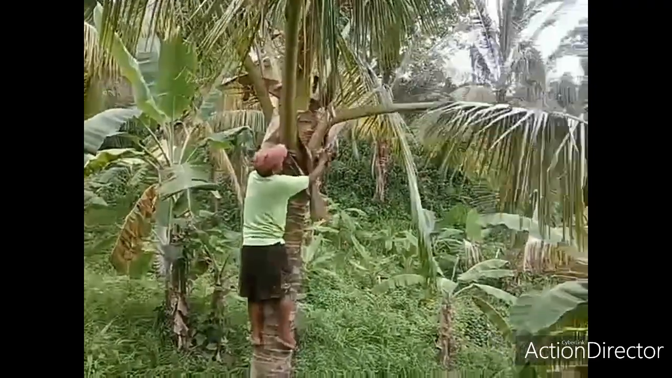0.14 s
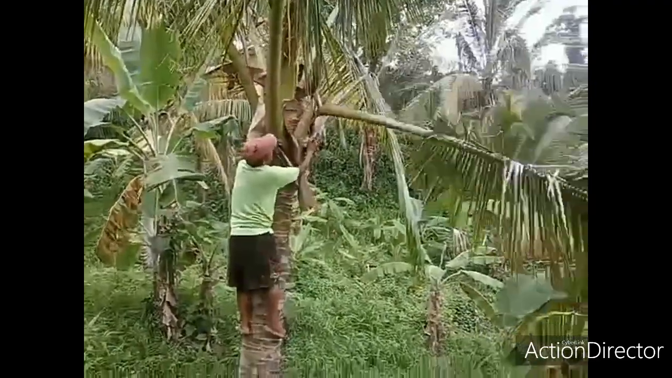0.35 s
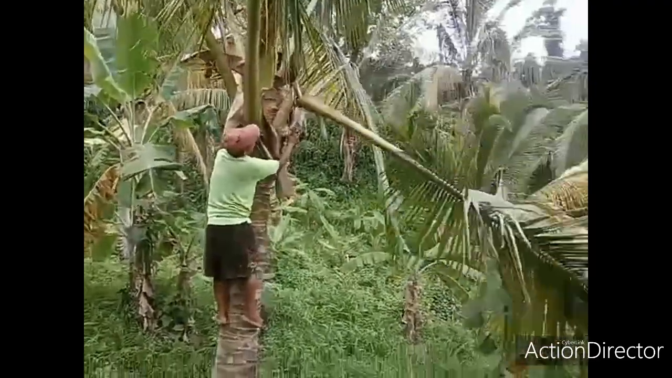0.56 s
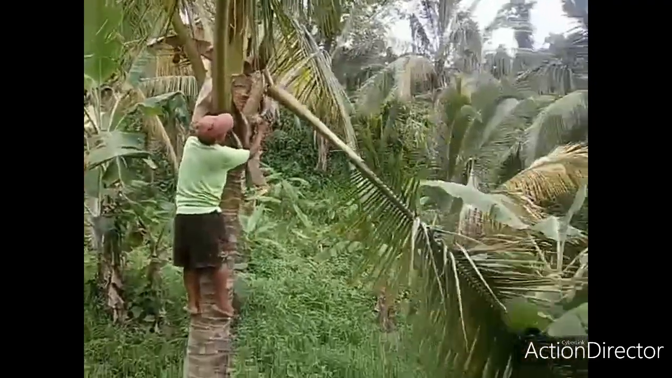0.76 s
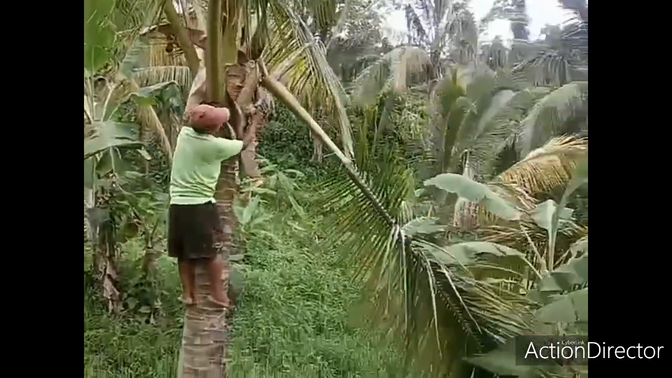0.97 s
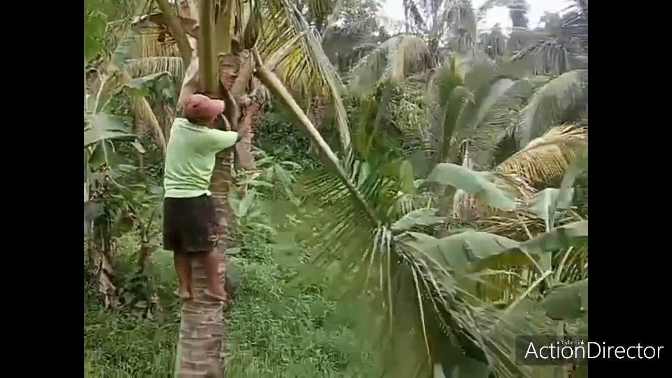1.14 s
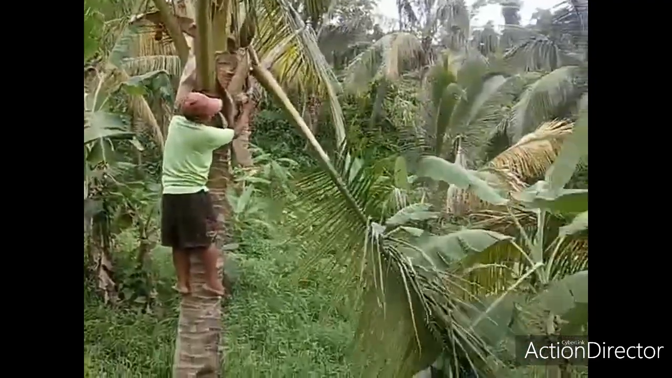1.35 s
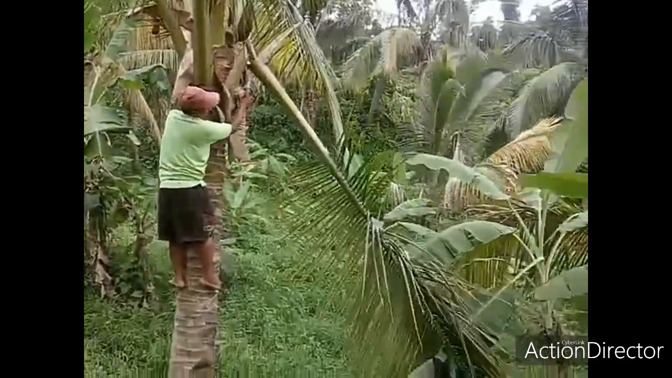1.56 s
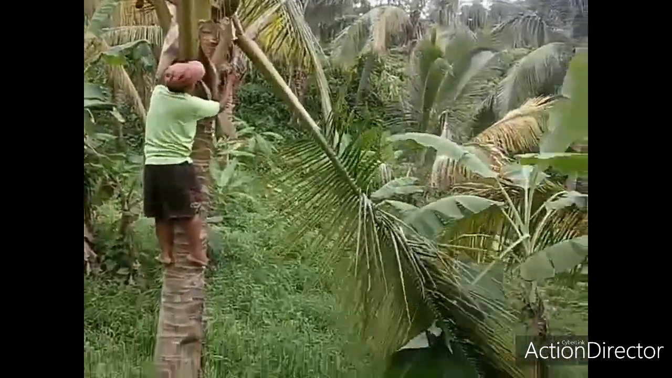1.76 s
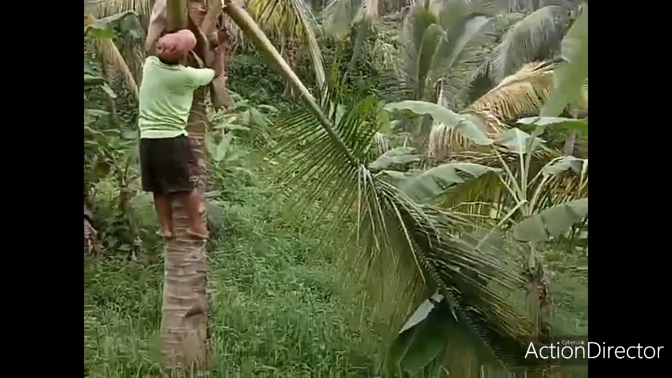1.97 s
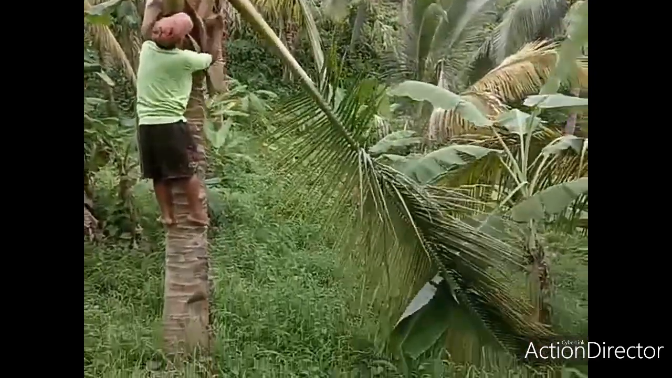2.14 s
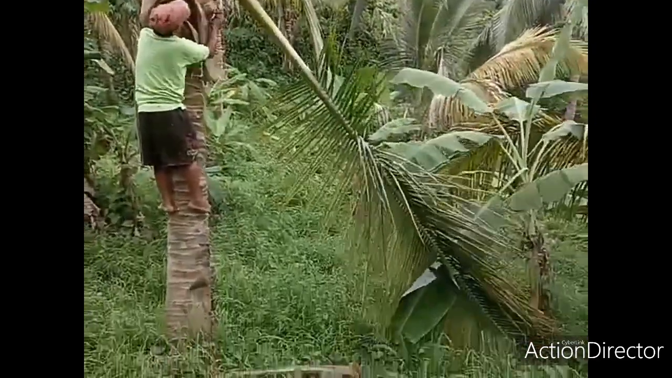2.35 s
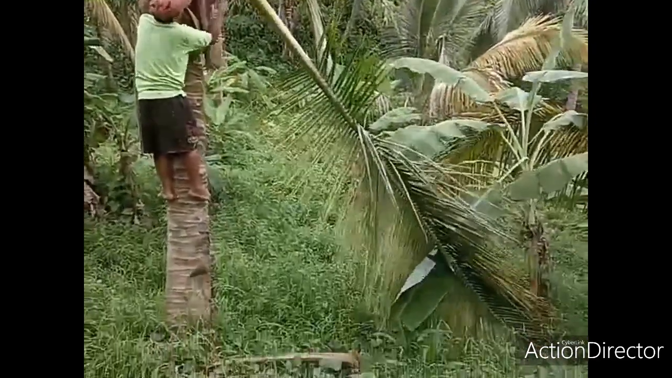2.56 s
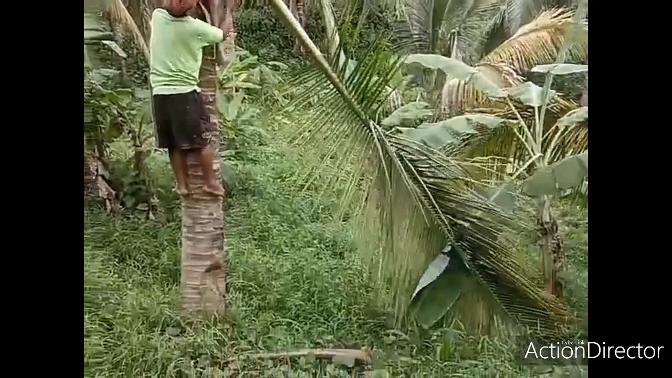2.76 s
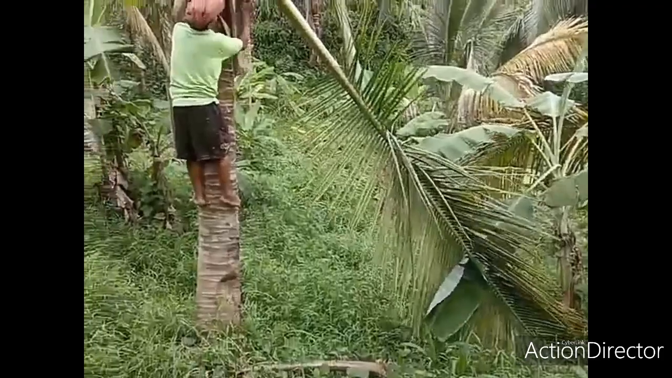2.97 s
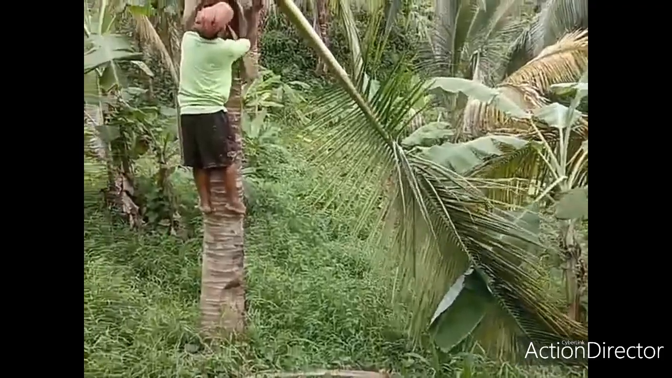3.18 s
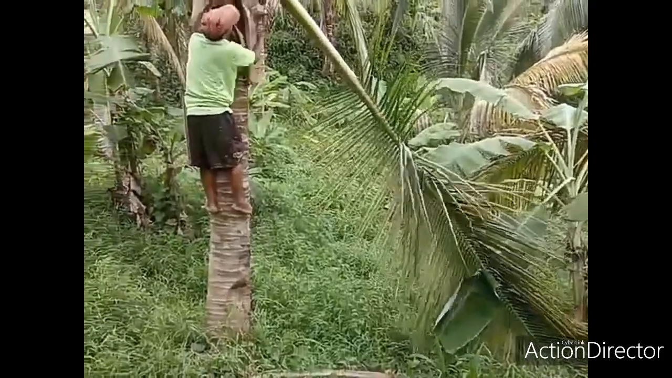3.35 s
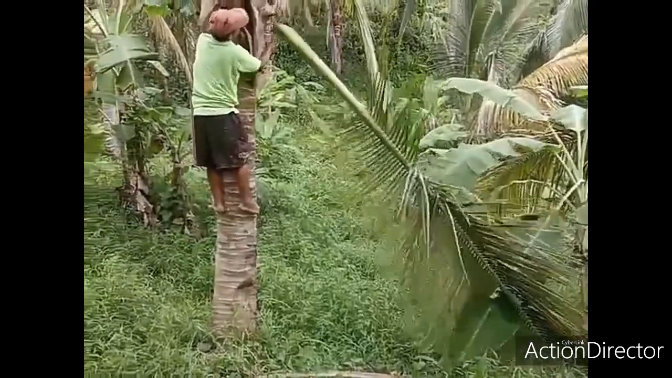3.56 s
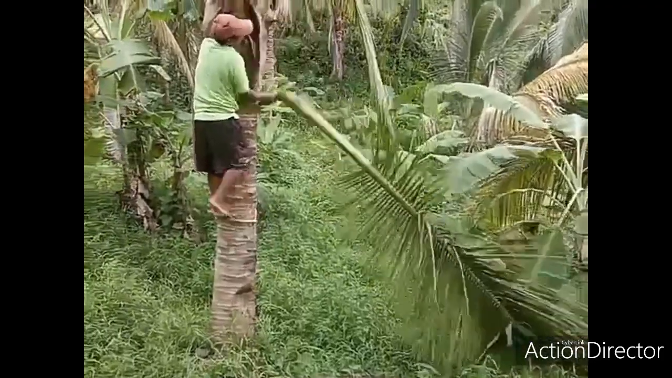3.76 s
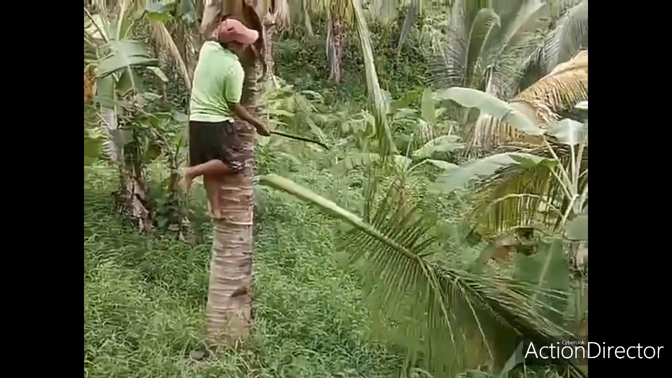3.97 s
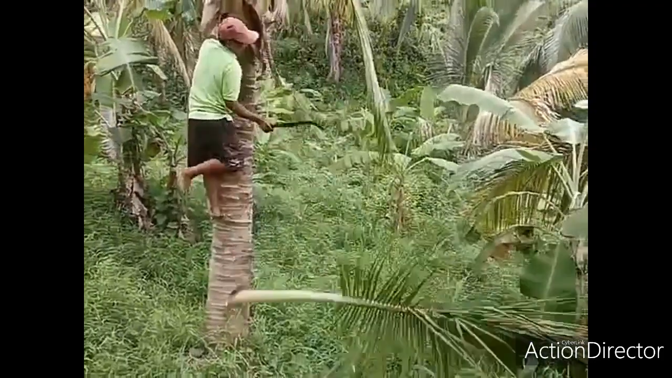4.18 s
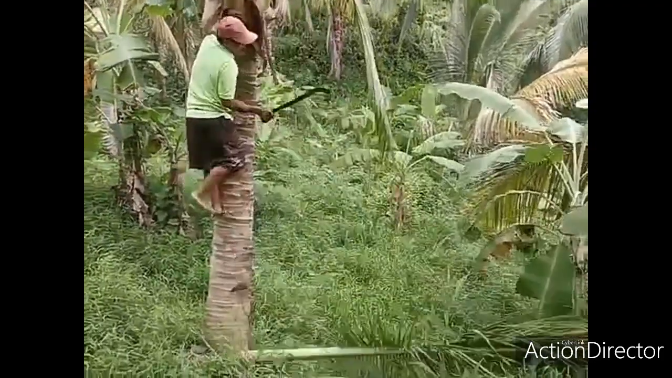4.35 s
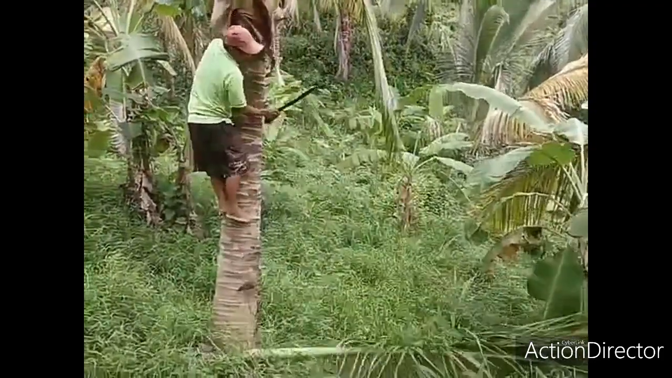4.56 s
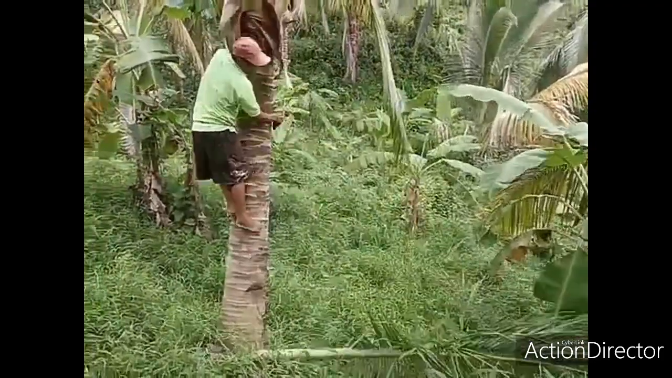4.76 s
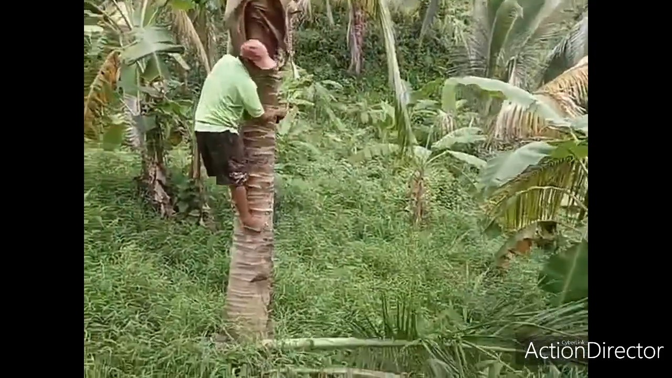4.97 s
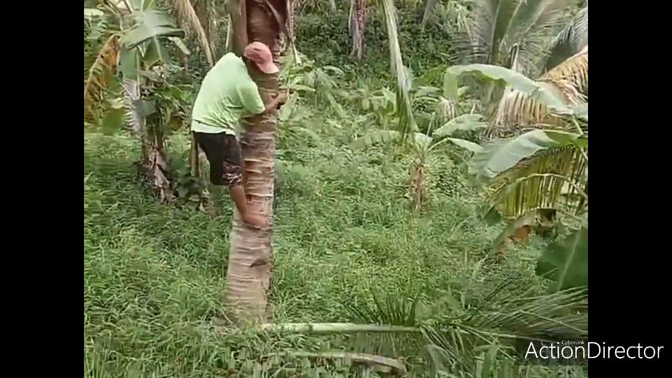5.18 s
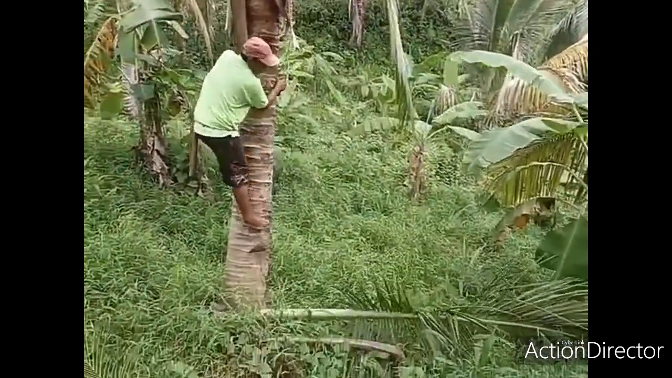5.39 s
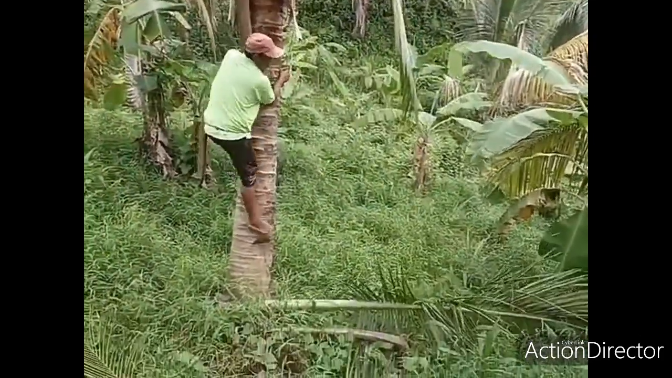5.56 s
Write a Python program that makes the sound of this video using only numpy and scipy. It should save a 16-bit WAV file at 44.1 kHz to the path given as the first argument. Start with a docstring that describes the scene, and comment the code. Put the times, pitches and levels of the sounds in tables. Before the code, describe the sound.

Sharp bright ticks and a burst of tearing fibre open over fizzing dry leaflets, then a hard wooden knock and crashing leaves. Things quieten, a blade raps the hollow base of the stalk, and after a short pause a second crack frees it. The frond swishes down, thumps, clatters and fades into faint rustles and tiny bird notes. Open-air grove with short diffuse reflections, one microphone, centred.

```python
"""A dry palm frond is cut, swings down and crashes into the undergrowth outdoors, a few metres away.
Sharp ticks and cracks of fibre are filtered noise bursts; the stalk's knocks ring wooden modes, over low thuds.
The blade then taps the hollow base as the stalk is worked free, and the frond, rustling as patchy noise and
tiny leaf taps, drops again, lands, creaks in stick-slip pulses and settles. Near the end a far bird whistles
gliding sines. Soft air noise lies under it all; one microphone feeds both channels."""
import sys
import numpy as np
from scipy import signal
from scipy.fft import rfft, irfft, next_fast_len
from scipy.io import wavfile
from scipy.ndimage import uniform_filter1d

SR = 44100
rng = np.random.default_rng(int(sys.argv[2]) if len(sys.argv) > 2 else 0)


def file_out(sig):
    """Save sig as 16-bit WAV at sys.argv[1]."""
    # one column per channel
    cols = np.atleast_2d(sig).T
    # limit, then scale
    lim = np.clip(cols, -1, 1)
    pcm = np.round(lim * 32767).astype(np.int16)
    wavfile.write(sys.argv[1], SR, pcm)


N = 247826

# bending modes of the stalk, before they are tuned to each blow: mode_hz [Hz], level_db [dB], t60_s [s]
STALK_MODES = [(250, -3, .03), (385, -1, .024), (620, -2, .017), (900, -1, .017), (1150, 0, .016),
               (1560, 0, .017), (1970, -2, .015), (2650, -5, .013)]


def gain_of(db):
    """Decibels to a factor."""
    return 10 ** (np.asarray(db) / 20)


def evened(x):
    """Scales to rms 1."""
    return x / np.sqrt(np.mean(x ** 2) + 1e-20)


def smooth_noise(count, size):
    """Slowly wandering noise of rms 1: white noise averaged over size samples."""
    return evened(uniform_filter1d(rng.standard_normal(count), size=size))


def read(points, hz):
    """Reads a spectrum in dB on a log-frequency axis."""
    point_hz, level_db = np.transpose(points)
    return np.interp(np.log(hz + 1), np.log(point_hz + 1), level_db)


def colour(x, points):
    """Filters by a spectrum."""
    size = next_fast_len(len(x))
    gain = gain_of(read(points, np.fft.rfftfreq(size, 1 / SR)))
    return irfft(rfft(x, size) * gain, size)[:len(x)]


def broad_band(x, hz, width):
    """A wide hump around hz, width in octaves, with little bass; peak 1."""
    f = np.fft.rfftfreq(len(x), 1 / SR) + 1
    hump = np.exp(-.5 * (np.log2(f / hz) / width) ** 2)
    bass_cut = 1 + (max(600, .16 * hz) / f) ** 4
    out = irfft(rfft(x) * hump / bass_cut, len(x))
    return out / abs(out).max()


def add(mix, start_s, sound):
    """Mixes a sound in at its start time."""
    part = mix[round(start_s * SR):][:len(sound)]
    part += sound[:len(part)]


def along(tables):
    """Reads the columns of joined curve tables at every sample."""
    time_s, *columns = np.transpose(np.concatenate(tables))
    return [np.interp(np.arange(N) / SR, time_s, c) for c in columns]


def patchy(points, patchy_db, flicker_db):
    """Noise whose short-time spectra carry drifting patches and a flicker common to all pitches."""
    frames = N // 64 + 5
    real, imaginary, patches = rng.standard_normal((frames, 129, 3)).T
    patches = uniform_filter1d(patches, size=6, axis=0)  # across pitch
    patches = evened(uniform_filter1d(patches, size=12, axis=1))  # across time
    flicker = smooth_noise(frames, 5)
    z = (real + 1j * imaginary) * gain_of(patchy_db * patches + flicker_db * flicker)
    noise = signal.istft(z, nperseg=256, noverlap=192)[1][:N]
    return evened(colour(noise, points))


def air():
    """Quiet outdoor air: patchy noise with its own colour."""
    # spectrum of the air: pitch_hz [Hz], level_db [dB per Hz]
    air_colour = [(18, -36.5), (30, -9.5), (114, -10), (186, -16), (254, -16), (304, -30.5), (2100, -28.5),
                  (3100, -15.5), (11100, -1), (14000, -20)]
    return gain_of(-64.5) * patchy(air_colour, 2.0, 2.0)


def whistle(level_db, length_s, start_hz, end_hz):
    """One soft bird note: a gliding sine with slightly unsteady pitch."""
    hz = np.linspace(start_hz, end_hz, round(length_s * SR))
    hz = hz * (1 + 0.02045 * smooth_noise(len(hz), 200))
    note = np.sin(2 * np.pi * np.cumsum(hz) / SR)
    return gain_of(level_db) * note * signal.windows.tukey(len(hz), .4)


def grove(x):
    """Trunks and leaves scatter each sound into a short diffuse tail of sparse random echoes."""
    t = np.arange(8000) / SR
    tail = rng.choice([-1., 1.], len(t)) * (rng.random(len(t)) < .05)
    tail = tail * gain_of(-60 * t / 0.22) * (t > .004)
    tail = colour(tail, [(600, -18), (1600, -12), (3500, 0)])
    return signal.fftconvolve(x, tail / np.linalg.norm(tail))[:N]


def thud(level_db, hz, t60_s):
    """A soft heavy part meets the ground: low, slightly uneven cycles that swell in quickly and die."""
    t = np.arange(8000) / SR
    wobble = 1 + .2 * smooth_noise(len(t), 300)
    swell = 1 - np.exp(-t * hz * 5.6)
    return gain_of(level_db - 60 * t / t60_s) * swell * np.sin(2 * np.pi * hz * np.cumsum(wobble) / SR)


def creak():
    """Uneven stick-slip pulses, each ringing a bending mode that shifts as the stalk settles."""
    # course of the landed stalk's creak: time_s [s], level_db [dB], slip_rate [slips per s], ring_hz [Hz]
    creak_course = [(4.455, -42, 94.08, 900), (4.507, -41.5, 126.46, 1076), (4.555, -39.5, 110, 880.3),
                    (4.595, -37, 120, 939.9), (4.61, -42, 102.4, 899.4)]
    time_s, *columns = np.transpose(creak_course)
    t = np.arange(time_s[0], time_s[-1], 1 / SR)
    level_db, slip_rate, ring_hz = (np.interp(t, time_s, c) for c in columns)
    turns = np.cumsum(slip_rate * (1 + .3 * smooth_noise(len(t), 300))) / SR
    # one pulse of uneven strength at each whole turn, over a faint scrape
    slips = (np.diff(np.floor(turns), prepend=0) > 0) * gain_of(1.5 * rng.standard_normal(len(t)))
    slips = slips + .035 * rng.standard_normal(len(t))
    # a resonator that follows the moving pitch
    spin = np.exp(2j * np.pi * np.cumsum(ring_hz) / SR)
    r = np.exp(-np.pi * 480 / SR)
    body = (spin * signal.lfilter([1], [1, -2 * r, r * r], slips / spin)).real
    return time_s[0], gain_of(level_db) * evened(body) * signal.windows.tukey(len(t), .1)


def ring(drive, loudest_hz, body):
    """A wooden body's modes answer a drive; where it is held and struck shifts them and picks the loudest."""
    t = np.arange(4000) / SR
    chance = rng.standard_normal((len(body), 2))
    nearest_hz = min((mode[0] for mode in body), key=lambda hz: abs(np.log(hz / loudest_hz)))
    modes = 0
    for (hz, db, t60), (level_chance, pitch_chance) in zip(body, chance):
        hz = hz * loudest_hz / nearest_hz
        octaves = np.log2(hz / loudest_hz)
        # modes away from the loudest are weaker, shorter and less certain
        db = db - 2.2 * octaves ** 2 - 5.2 * (1 - np.exp(-(octaves / 0.22) ** 2))
        swell = 1 - np.exp(-t * hz * 1.5)
        t60 = t60 * (1 if octaves else 1.3)
        db = db + 2.5 * level_chance * (octaves != 0)
        hz = hz * (1 + (.07 if octaves else .015) * pitch_chance)
        modes = modes + gain_of(db - 60 * t / t60) * swell * np.sin(2 * np.pi * hz * t)
    out = signal.fftconvolve(drive, modes)
    out = signal.sosfilt(signal.butter(2, .6 * body[0][0], "high", fs=SR, output="sos"), out)
    return out / abs(out).max()


def knock(level_db, ring_hz, click_db, body=STALK_MODES):
    """A sharp contact and its splintery chatter ring the wood, with a brief bright click on top."""
    t = np.arange(2000) / SR
    chatter = .5 * rng.standard_normal(len(t)) * (rng.random(len(t)) < .02)
    contact = chatter * gain_of(-60 * t / .05)
    contact[0] = 1
    click = broad_band(rng.standard_normal(len(t)), 5500, 1.5)
    click = click * (gain_of(3.0 - 60 * t / 0.029) + gain_of(-1.0 - 60 * t / 0.09))
    return gain_of(level_db) * (ring(contact, ring_hz, body) + gain_of(click_db) * np.pad(click, (0, 3999)))


def tap(level_db, ring_hz, click_db):
    """The blade taps the hollow base of the frond: a knock that rings the base's own modes."""
    # modes of the hollow base, before they are tuned to each tap: mode_hz [Hz], level_db [dB], t60_s [s]
    hollow_modes = [(590, 0, .022), (920, 0, .022), (1590, 0, .018), (2040, -2, .018), (2490, -4, .016)]
    return knock(level_db, ring_hz, click_db, hollow_modes)


def sharp_tick(level_db, hz):
    """A leaflet's snap or a crack's hard edge: a tick of a millisecond or two and its bounce off the ground."""
    t = np.arange(500) / SR
    fade = gain_of(-60 * t / 0.016)
    tone = 0.68 * np.sin(2 * np.pi * hz * t) * fade
    tick = (broad_band(rng.standard_normal(len(t)), hz, 0.72) + tone) * fade
    tick = signal.sosfilt(signal.butter(4, hz / 2, "high", fs=SR, output="sos"), tick)
    tick = np.pad(tick / abs(tick).max(), (0, 300))
    bounce = gain_of(-10.5) * np.roll(tick, round(.006 * SR))
    return gain_of(level_db) * (tick + bounce)


def crack(level_db, tear_s, hz, wood_db, wood_hz):
    """A sharp first break, then a clump of tearing fibres that dies away; it also shakes the stalk."""
    t = np.arange(6000) / SR
    lumps = gain_of(3.5 * smooth_noise(len(t), 40))
    # full strength for tear_s, then a fade that is slower after a longer tear
    fade = gain_of(-60 * np.maximum(t - tear_s, 0) / (0.0089 + 2.2 * tear_s))
    shape = np.minimum(t / 0.00024, 1) * fade
    shape = shape * (1 + 1.4 * np.exp(-t / .0015))  # the first break
    tear = rng.standard_normal(len(t)) * lumps
    crisp = broad_band(tear, hz, 2.08) * shape
    crisp = np.pad(crisp / abs(crisp).max(), (0, 3999))
    wood = gain_of(wood_db) * ring(tear * shape ** 2, wood_hz, STALK_MODES)
    return gain_of(level_db) * (crisp + wood)


def grains(points, per_s, spread_db, cycles, lo_hz, hi_hz):
    """Many tiny taps of leaf on leaf, each a few dying cycles; a few are large."""
    size = gain_of(spread_db * np.minimum(rng.exponential(1, N), 5)) * (rng.random(N) < per_s / SR)
    kind = rng.integers(0, 24, N)
    t, out = np.arange(600) / SR, np.zeros(N)
    for k, hz in enumerate(np.geomspace(lo_hz, hi_hz, num=24)):
        leaf_tap = np.sqrt(hz) * np.sin(2 * np.pi * hz * t) * np.exp(-t * hz / cycles)
        out += np.sqrt(hz) * signal.oaconvolve(size * (kind == k), leaf_tap)[:N]
    return evened(colour(out, points))


def shaken():
    """A blow or breath of wind shakes the leaves: a quick swell, then a decay; the powers add."""
    # shakes: peak_s [s], leaflets_db [dB], broad_db [dB], rise_s [s], t60_s [s]
    shakes = [(0.1, -35, -57.5, 0.009, 1.693), (0.245, -21.5, -35, 0.0058, 0.2),
              (0.668, -35, -69, 0.033, 0.18), (1.22, -34, -76, 0.013, 1.25), (1.339, -36, -39, 0.12, 1.1),
              (1.46, -36.5, -38.5, 0.00796, 0.58), (1.555, -35, -36.5, 0.028, 0.07),
              (1.62, -39.5, -50, 0.01808, 0.087), (2.265, -43, -55, 0.038, 1.549),
              (2.395, -47, -46, 0.005, 0.37), (2.84, -53, -64.5, 0.0095, 0.46),
              (2.924, -56, -90, 0.014, 0.32), (3.1, -50.5, -82, 0.21, 0.38),
              (3.298, -44.5, -80, 0.024, 0.64), (3.36, -45, -41, 0.023, 0.73),
              (3.713, -38, -40, 0.00313, 1.37), (4.231, -21.5, -39, 0.0087, 0.0885),
              (4.49, -25, -39.5, 0.037, 0.77), (5.4, -52, -82, 0.042, 0.36), (5.504, -47, -94, 0.078, 0.14)]
    t, power = np.arange(N) / SR, np.zeros((2, N))
    t60_share = np.array([[1], [0.68]])  # broad leaves come to rest sooner than leaflets
    for peak_s, leaflets_db, broad_db, rise_s, t60_s in shakes:
        rise_db = -20 * (peak_s - t) / rise_s
        decay_db = -60 * (t - peak_s) / t60_s / t60_share
        shape_db = np.where(t < peak_s, rise_db, decay_db)
        power += (gain_of([[leaflets_db], [broad_db]]) * gain_of(np.maximum(shape_db, -200))) ** 2
    return power


def reflected(x):
    """The low-hanging leaves are heard again off the ground: a close, dull echo combs the lower pitches."""
    # full strength of the echo: pitch_hz [Hz], level_db [dB]
    echo_colour = [(300, -9), (500, -6), (2000, -6), (2600, -10), (3500, -24)]
    # the echo grows as the frond tip comes down: time_s [s], share [factor]
    echo_growth = [(0.4, 0.16), (1.2, 0.61)]
    delay_s, lead_turns = .00136, .15
    size = next_fast_len(len(x) + 999)
    hz = np.fft.rfftfreq(size, 1 / SR)
    echo = gain_of(read(echo_colour, hz)) * np.exp(-2j * np.pi * (hz * delay_s - lead_turns))
    share = np.interp(np.arange(len(x)) / SR, *np.transpose(echo_growth))
    return x + share * irfft(rfft(x, size) * echo, size)[:len(x)]


def frond():
    """Leaflets fizz and tick, broad leaves and stalk rustle lower, the whole frond swishes."""
    # first swing, then drop: time_s [s], leaflets_db [dB], brightness_db [dB], broad_db [dB], deep_swish_db [dB]
    falls = [
        [(0.0, -33, -5, -50, -59), (0.22, -36, -2, -44, -60.5), (0.45, -28, -1, -38.5, -46.5),
         (0.6, -42.5, 5, -45.5, -55.5), (0.82, -29, -3, -37, -48.5), (0.94, -35.5, -0.5, -40, -48.5),
         (1.12, -36.5, 4.5, -39.5, -47), (1.28, -31.5, -4.5, -40.5, -54.5), (1.44, -37, -10, -50, -80),
         (1.56, -47, -1, -53.5, -95), (1.68, -63.5, 4, -88, -112.5), (1.8, -55, 4.5, -101, -83.5),
         (2.05, -52.5, -2.5, -73.5, -82), (2.15, -74.5, 11.5, -81, -89)],
        [(3.3, -79, -1, -86, -78), (3.48, -46, 0, -58, -67), (3.69, -37, -2, -47.5, -70),
         (3.79, -33.5, -4.5, -50.5, -50.5), (3.9, -36.5, -1.5, -51.5, -59), (4.19, -35.5, -1.5, -45.5, -63.5),
         (4.3, -33.5, -1, -41.5, -47), (4.45, -29, -1, -39.5, -45.5), (4.6, -45.5, -4, -54, -48.5),
         (4.82, -45, 2, -52.5, -65), (5.0, -51, -1, -74.5, -75.5), (5.22, -52.5, 1, -80.5, -79.5),
         (5.62, -66, 7, -82.5, -87.5)],
    ]
    # spectra of leaflets, broad leaves and stalk, and deep swish: pitch_hz [Hz], level_db [dB per Hz]
    leaflet_colour = [(590, -50.5), (1000, -35), (1900, -16.5), (4640, -6), (6460, -3.5), (7880, -11),
                      (9940, -11.5), (14000, -10)]
    broad_colour = [(120, -12), (330, 0.5), (650, -0.5), (1500, -4), (2300, -9.5), (4000, -7)]
    deep_colour = [(20, -26), (55, -19.5), (120, -9), (220, -6), (400, -23)]
    # shaken broad leaves carry little bass: pitch_hz [Hz], level_db [dB]
    thin_colour = [(200, -25), (600, 0)]
    shake_bright_db = -2
    fizz_db, bright_db, broad_db, deep_db = along(falls)
    fizz_shake, broad_shake = shaken()

    fizz = patchy(leaflet_colour, 1.68, 1.1) + 0.42 * grains(leaflet_colour, 2500, 4.2, 2.4, 2200, 13000)
    fizz = evened(fizz)
    dull = colour(fizz, [(3000, -7.5), (7000, -38.5)])
    crisp = fizz - dull
    # brightness tilts the leaflets between their dull and crisp parts
    dull_gain = np.sqrt(gain_of(fizz_db - bright_db) ** 2 + fizz_shake * gain_of(-shake_bright_db) ** 2)
    crisp_gain = np.sqrt(gain_of(fizz_db + bright_db) ** 2 + fizz_shake * gain_of(shake_bright_db) ** 2)
    leaflets = dull_gain * dull + crisp_gain * crisp

    rustle = evened(patchy(broad_colour, 2.5, 2.5) + .45 * grains(broad_colour, 1500, 2.8, 3.5, 250, 2500))
    broad = gain_of(broad_db) * rustle + np.sqrt(broad_shake) * colour(rustle, thin_colour)
    swish = gain_of(deep_db) * patchy(deep_colour, 1.5, 1.6)
    return leaflets + broad + swish


def scene():
    """All sources at one microphone."""
    # a far bird: start_s [s], level_db [dB], length_s [s], start_hz [Hz], end_hz [Hz]
    bird_notes = [(5.21, -72, 0.09, 1995, 1950), (5.30, -75, 0.071, 1580, 1560),
                  (5.372, -69, 0.1, 2100, 2080)]
    # soft heavy parts meet the ground: start_s [s], level_db [dB], pitch_hz [Hz], t60_s [s]
    thuds = [(1.335, -37.5, 133, 0.17), (1.895, -64.5, 131.3, 0.13), (2.212, -52, 232, 0.12),
             (2.299, -42.5, 203.6, 0.094), (3.388, -36.5, 270, 0.023), (4.233, -29.5, 206.3, 0.074),
             (4.318, -29, 250, 0.081), (4.358, -36, 194, 0.092), (4.405, -30, 200, 0.07),
             (4.458, -36.5, 297, 0.09), (4.567, -38.5, 310, 0.1), (4.95, -58.5, 244, 0.15)]
    # the stalk knocks on trunk, stems or ground:
    # start_s [s], level_db [dB], loudest_ring_hz [Hz], click_db [dB relative to level_db]
    knocks = [(0.255, -25, 1910, -19.5), (0.264, -24, 1136, -20.5), (0.278, -27.5, 1158, -21.5),
              (0.964, -20, 693, -28.5), (0.9655, -19, 1534, -28.5), (0.971, -24, 358, -17.5),
              (1.705, -59, 855, -20), (2.214, -42, 1190, -3), (2.278, -28.5, 395, -21),
              (3.374, -28.5, 450, -1), (3.652, -38, 1027, -6.5), (4.237, -22, 1880, -9.5),
              (4.327, -26.5, 1180, -9.5), (4.351, -28, 1090, 2), (4.467, -32, 900, -13),
              (4.489, -27, 1540, -14.5), (4.5, -25, 1550, -14), (4.52, -33, 935, -9),
              (4.547, -25, 911, -20)]
    # the blade taps the hollow base: columns as for the knocks
    taps = [(2.308, -31.5, 1610, -18), (2.322, -36.5, 935, -8.5), (2.349, -39, 1574, 8),
            (2.391, -34, 1559, 1), (2.404, -36, 1581, 0.5), (2.41, -40, 927, -7), (2.455, -39, 620, -11),
            (2.461, -31, 1612, -0.5), (2.466, -34, 924, -13), (2.476, -44.5, 1550, -3.5),
            (2.522, -34, 568, 3), (2.525, -36.5, 2010, -1), (2.772, -42, 925, 4.5), (2.774, -49.5, 583, -3),
            (2.786, -42, 925, 2.5), (2.833, -49, 940, 10.5)]
    # sharp ticks: a leaflet snaps, or the hard edge of a crack: start_s [s], level_db [dB], centre_hz [Hz]
    sharp_ticks = [(0.0415, -19, 7364), (0.0979, -16.5, 7190), (0.1884, -16.5, 9100), (0.2073, -16.5, 9700),
                   (0.3132, -17, 9700), (0.3354, -22, 6380), (0.5574, -16, 6650), (0.598, -12, 6420),
                   (0.6503, -19, 6100), (0.6694, -10.5, 6300), (0.7742, -25, 4580), (0.7305, -27, 10040),
                   (1.2251, -15.5, 10820), (1.301, -26.5, 5100), (1.5978, -35, 5892), (1.915, -38.5, 6180),
                   (2.247, -32, 9400), (2.2715, -28, 6000), (2.517, -48.5, 4560), (2.9195, -48.5, 4510),
                   (3.2903, -36, 3680), (3.358, -14.5, 6350), (3.7115, -23, 6500), (3.8582, -27.5, 3326),
                   (4.947, -37, 7000), (5.495, -48, 3300), (5.501, -45, 3300), (5.51, -39, 3520)]
    # fibres tear or leaves slap: start_s [s], level_db [dB], tear_s [s], centre_hz [Hz],
    # wood_db [dB relative to level_db], loudest_ring_hz [Hz]
    cracks = [(0.2238, -12.5, 0.0065, 6874, -17.5, 507), (0.2403, -8.5, 0.02, 9430, -45, 1120),
              (0.2484, -8.5, 0.001126, 8310, -15, 1095), (0.2635, -9.5, 0.013, 10260, -18, 391),
              (0.2764, -18, 0.021, 5870, -17, 399.8), (1.335, -23, 0.0055, 4990, -7, 880),
              (1.347, -27.5, 0.00452, 2997, -6, 639), (1.403, -22, 0.005215, 4410, -10, 1160),
              (1.4575, -21.5, 0.01, 4460, -11, 1510), (1.4994, -31.5, 0.014, 4970, -5, 1420),
              (1.5383, -33, 0.0067, 5266, -23, 679.5), (1.557, -34, 0.0037, 2980, -13, 920),
              (2.2103, -36.5, 0.058, 3284, -24, 1200), (2.2712, -18.5, 0.0074, 3250, -12, 1590),
              (2.2755, -10, 0.0035, 3470, -26, 2020), (2.2815, -18.5, 0.0018, 3265, -8.5, 1176),
              (2.3127, -23.5, 0.009, 6360, -17, 1588), (3.358, -11, 0.013, 4954, -18, 1200),
              (3.4262, -21, 0.011, 5330, -12, 756), (3.7172, -23, 0.044, 2808, -13, 677),
              (3.7325, -30.5, 0.041, 6010, -4, 666.4), (3.8049, -20.5, 0.0092, 6410, -13.5, 1402),
              (4.223, -16.5, 0.012, 4537, -4, 1021), (4.304, -24.5, 0.014, 2997, -12, 1880),
              (4.3205, -20.5, 0.0083, 4720, -11.5, 284), (4.407, -18, 0.01202, 3600, -18, 314.5),
              (4.4844, -37, 0.00591, 4702, -12, 1600), (4.5064, -31, 0.0053, 6670, 3.5, 1099)]
    hits = np.zeros(N)
    for table, sound in [(bird_notes, whistle), (thuds, thud), (knocks, knock), (taps, tap),
                         (sharp_ticks, sharp_tick), (cracks, crack)]:
        for start_s, *settings in table:
            add(hits, start_s, sound(*settings))
    add(hits, *creak())
    mono = air() + hits + gain_of(-5.5) * grove(hits) + reflected(frond())
    return np.array([mono, mono])


def suppress(x):
    """Noise suppressor: bins near their own quiet level are turned down."""
    z = signal.stft(x, nperseg=1024, noverlap=768)[2]
    power = uniform_filter1d(abs(z) ** 2, size=5, axis=1)  # across time
    power = uniform_filter1d(power, size=3, axis=0)  # across pitch
    level_db = 10 * np.log10(power + 1e-20)
    over_db = level_db - np.percentile(level_db, 15, axis=1, keepdims=True)
    cut_db = 0.31 * np.clip(over_db - 9.0, -9, 0)
    return signal.istft(z * gain_of(cut_db), nperseg=1024, noverlap=768)[1][:N]


def record(dry):
    """Noise suppressor, microphone colour, then the band limit."""
    # response of the microphone: pitch_hz [Hz], level_db [dB]
    microphone = [(25, -13.5), (90, -1), (3000, 0.5), (6500, -3), (8100, -5.5), (10200, 1), (13900, -7),
                  (14250, -21.5), (14900, -62)]
    edge_hz = 15283
    mono = colour(suppress(dry[0]), microphone)
    low_pass = signal.firwin(511, edge_hz, window=("kaiser", 9), fs=SR)
    mono = signal.oaconvolve(mono, low_pass, "same")
    return np.array([mono, mono])


dry = scene()
out = record(dry)
file_out(out)
```